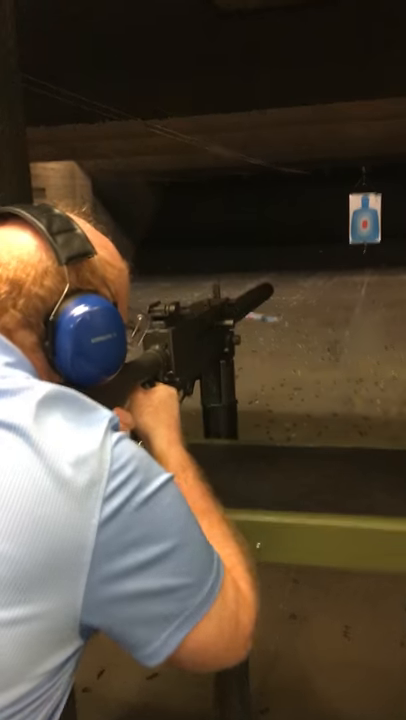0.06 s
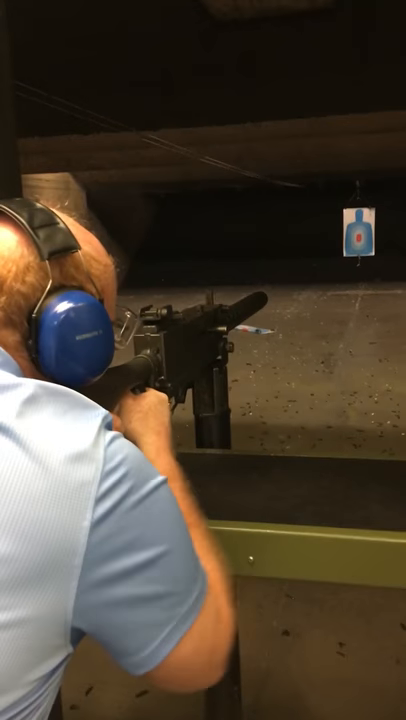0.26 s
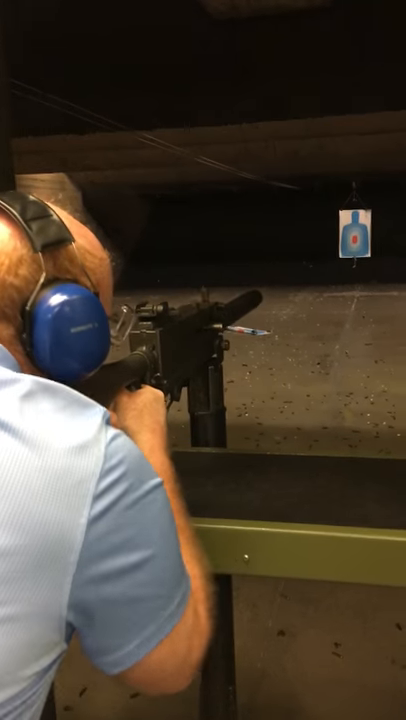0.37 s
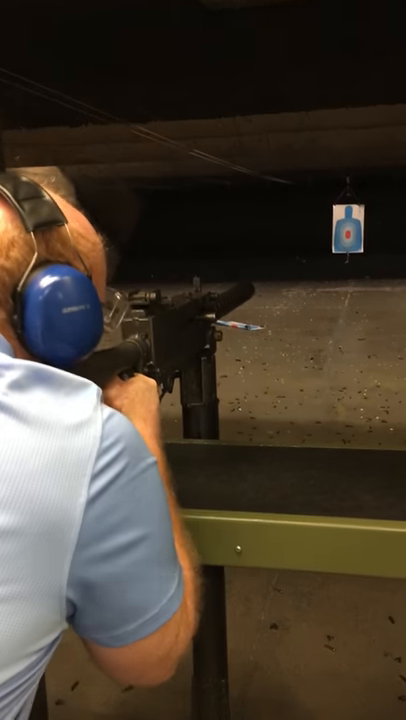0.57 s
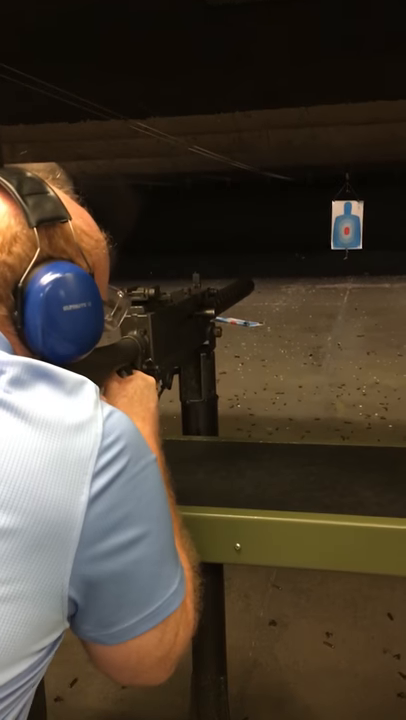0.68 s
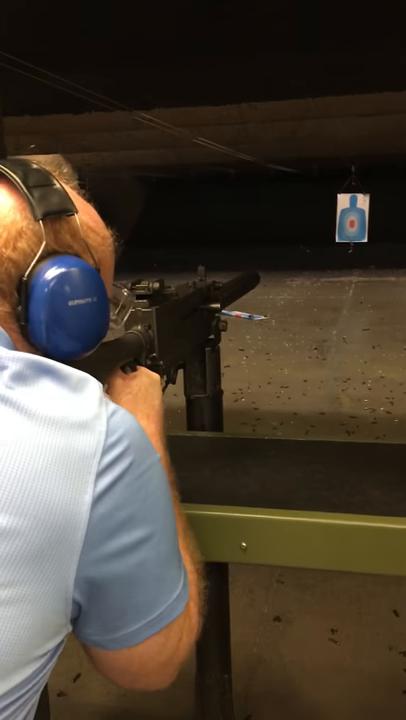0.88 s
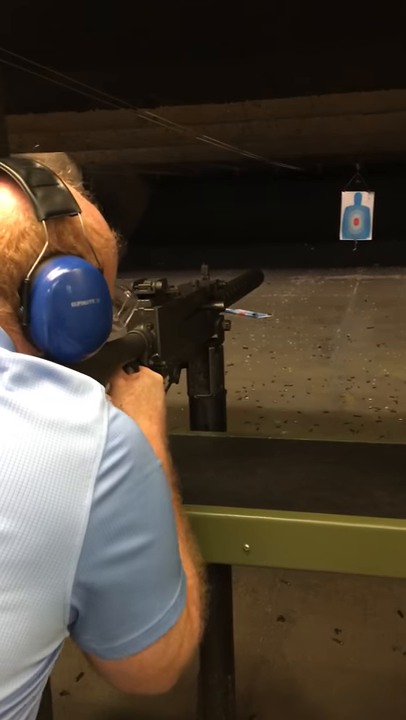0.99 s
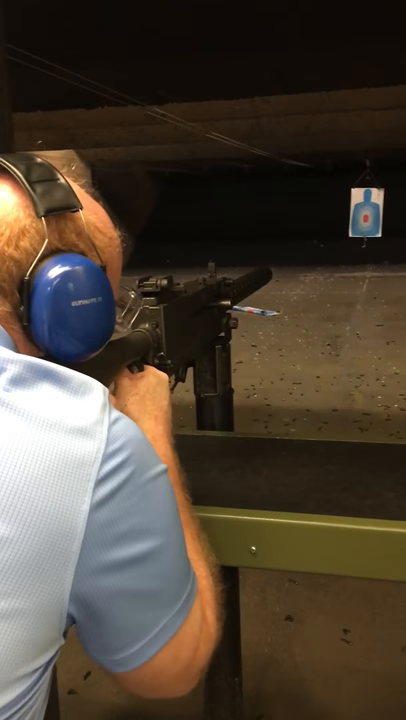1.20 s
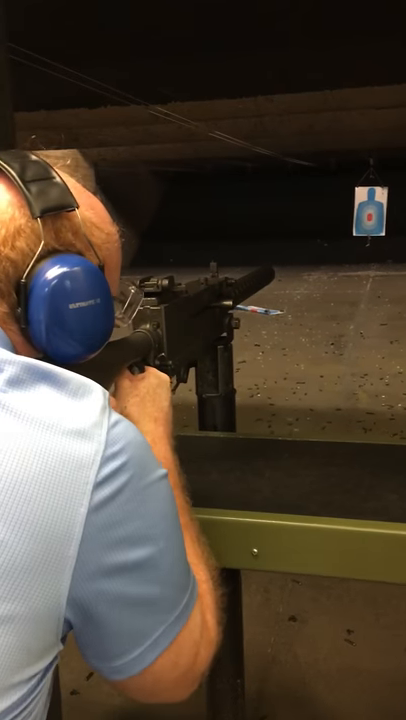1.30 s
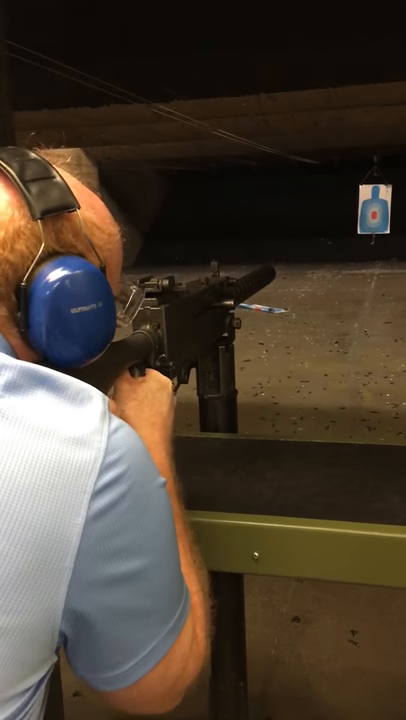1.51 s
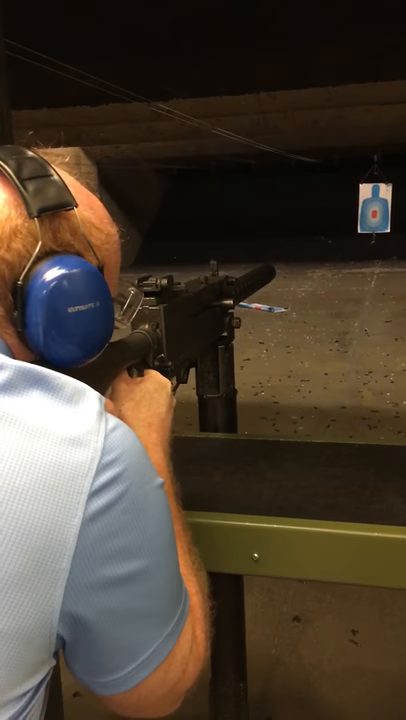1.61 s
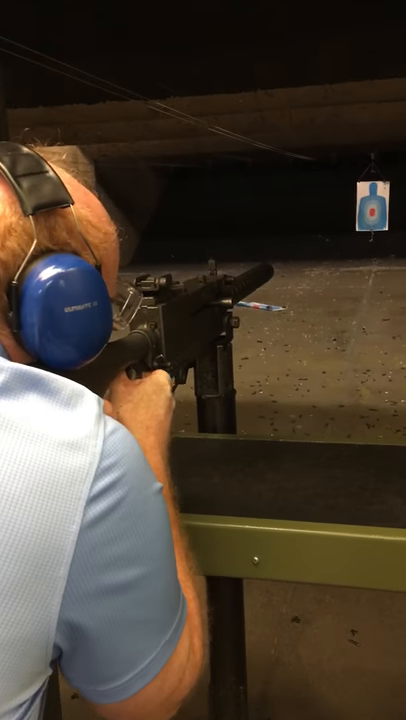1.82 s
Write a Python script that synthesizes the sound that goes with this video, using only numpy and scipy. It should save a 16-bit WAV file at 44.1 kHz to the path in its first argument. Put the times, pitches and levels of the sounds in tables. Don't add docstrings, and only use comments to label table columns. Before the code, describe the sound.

A single loud gunshot blasts in an indoor range, its roar fading under jingling brass cases

```python
import sys
import numpy as np
from scipy import signal
from scipy.fft import rfft, irfft
from scipy.io import wavfile
from scipy.ndimage import uniform_filter1d, minimum_filter1d

SR = 44100
rng = np.random.default_rng(int(sys.argv[2]) if len(sys.argv) > 2 else 0)


def natural_amplitude(level_db):
    exponent = np.asarray(level_db, float) / 20
    return 10 ** exponent


def log_audio(samples):
    frames = np.atleast_2d(samples).T
    limited = np.clip(frames, -1, 1)
    pcm = np.round(limited * 32767).astype(np.int16)
    wavfile.write(sys.argv[1], SR, pcm)


N = 81585
T = np.arange(N) / SR
SHOT_S = 0.2389

CASE_A_HZ, CASE_B_HZ, CASE_C_HZ, CASE_D_HZ = 7450, 8190, 9850, 10900
CASE_E_HZ, CASE_F_HZ, CASE_G_HZ = 12250, 15550, 12500

# frequency in Hz, level in dB per Hz.
SCRAPE_COLOUR = [(1500, -10), (2500, -8.5), (4500, -6.5), (7000, -3), (10000, -5.5), (12700, -5),
                 (13500, -8.5), (15800, -6.5)]


def evened(x):
    return x / np.sqrt(np.mean(x ** 2) + 1e-20)


def noise():
    return rng.standard_normal(N)


def curve(points):
    return natural_amplitude(np.interp(T, *np.transpose(points)))


def read(points, hz):
    f, value = np.transpose(points)
    return np.interp(np.log(hz + 1), np.log(f + 1), value)


def filtered(x, points):
    hz = np.fft.rfftfreq(len(x), 1 / SR)
    return irfft(rfft(x) * natural_amplitude(read(points, hz)), len(x))


def colour(x, points):
    return evened(filtered(x, points))


def slow(seconds):
    size = max(int(seconds * SR), 1)
    return evened(uniform_filter1d(uniform_filter1d(noise(), size), size))


def resonate(x, hz, width_hz):
    r = np.exp(-np.pi * width_hz / SR)
    return signal.lfilter([1, 0, -1], [1, -2 * r * np.cos(2 * np.pi * hz / SR), r * r], x)


def clicks(per_s, spread_db):
    size = natural_amplitude(spread_db * np.minimum(rng.exponential(1, N), 4))
    return size * (rng.random(N) < per_s / SR) * rng.choice([-1., 1.], N)


def burst(start_s, decay_s):
    return np.exp(-np.maximum(T - start_s, 0) / decay_s) * (T > start_s)


def dying(points, t60s, start_s):
    hz, at_s, z = signal.stft(colour(noise(), points), SR, nperseg=512)
    fade_db = -60 * np.maximum(at_s - start_s, 0) / read(t60s, hz)[:, None]
    return signal.istft(z * natural_amplitude(fade_db), SR, nperseg=512)[1][:N]


def air():
    # frequency in Hz, level in dB per Hz.
    air_colour = [(25, 1.5), (70, -14.5), (150, -2.5), (400, -16.5), (1100, -14), (2400, -15), (4100, -35),
                  (9000, -48.5)]
    # frequency in Hz, width in Hz, level in dB.
    duct_tones = [(506, 20, -46), (1045, 40, -45), (300, 25, -51), (1390, 80, -49)]
    level_db, patch_db, waver_db = -37, 0.6, 1.5
    out = natural_amplitude(level_db + patch_db * slow(0.028)) * colour(noise(), air_colour)
    for hz, width_hz, db in duct_tones:
        out = out + natural_amplitude(db + waver_db * slow(0.13)) * evened(resonate(noise(), hz, width_hz))
    return out


def grip():
    # time in seconds, level in dB.
    grip_level = [(0, -37), (.2, -36.5), (.5, -33), (.9, -40.5), (1.1, -39.5), (1.15, -35), (1.21, -45.5),
                  (1.28, -29.5), (1.38, -42), (1.43, -23.5), (1.48, -33), (1.55, -30), (1.585, -41),
                  (1.61, -26.5), (1.65, -41), (1.71, -30), (1.76, -33), (1.79, -40), (1.83, -30.5),
                  (1.85, -31)]
    centre_hz, width_hz, lump_db = 66, 22, 1.2
    low = noise()
    for widen in (1, 2, 2):
        low = resonate(low, centre_hz, widen * width_hz)
    low = evened(low)
    power = abs(uniform_filter1d(low ** 2, size=SR // 40))
    steady = low / np.sqrt(power + 0.05)
    return curve(grip_level) * evened(steady * natural_amplitude(lump_db * slow(0.023)))


def brass():
    # time in seconds, level in dB.
    stir_level = [(0, -32.5), (.18, -28), (.23, -30), (.5, -40), (.72, -51), (.95, -86), (1.1, -56.5),
                  (1.16, -48), (1.32, -46), (1.42, -52), (1.435, -38), (1.51, -37.5), (1.545, -41),
                  (1.6, -40), (1.64, -36.5), (1.72, -29), (1.8, -30), (1.85, -37)]
    # time in seconds, level in dB.
    ring_level = [(0, 0), (.4, -3), (.5, -0.5), (.9, 2), (1.05, -17), (1.4, -14.5), (1.45, -4), (1.62, -3),
                  (1.7, 3.5), (1.85, 3.5)]
    # frequency in Hz, width in Hz, level in dB.
    case_modes = [(4300, 900, -8), (CASE_A_HZ, 120, -12), (CASE_B_HZ, 45, -10), (CASE_C_HZ, 120, -9),
                  (10780, 60, -8), (11000, 90, -6), (11600, 60, -15), (CASE_E_HZ, 80, -6), (12600, 170, -5),
                  (14750, 80, -14), (CASE_F_HZ, 150, -4)]
    # start in seconds, level in dB, decay in seconds.
    case_knocks = [
        (.503, -33, .006),
        (.703, -42, .004),
        (1.2746, -41, .004),
        (1.312, -37, .012),
        (1.4293, -31, .005),
        (1.45, -31, .01),
        (1.652, -30, .005),
        (1.717, -25, .01),
    ]
    clinks_per_s, clink_spread_db, ring_db, patchy_db = 900, 2.5, -2, 2.5
    grit_per_s, grit_spread_db, scrape_db = 6000, 1, -1.5
    ring = 0
    for hz, width_hz, db in case_modes:
        mode = resonate(clicks(clinks_per_s, clink_spread_db), hz, width_hz)
        mode = evened(resonate(mode, hz, 4 * width_hz))
        ring = ring + natural_amplitude(db + patchy_db * slow(0.052)) * mode
    ring = natural_amplitude(ring_db) * curve(ring_level) * evened(ring)
    scrape = colour(clicks(grit_per_s, grit_spread_db), SCRAPE_COLOUR) * natural_amplitude(0.81 * slow(0.087))
    knocks = sum(natural_amplitude(db) * burst(start_s, decay_s) for start_s, db, decay_s in case_knocks)
    stirred = curve(stir_level) * (ring + natural_amplitude(scrape_db) * scrape)
    return stirred + knocks * colour(noise(), SCRAPE_COLOUR)


def pings():
    # start in seconds, frequency in Hz, level in dB, length in seconds, spread in Hz.
    rattles = [(0.053, 11310, -36.5, 0.13, 152), (0.065, CASE_F_HZ, -39, .04, 150),
               (0.1, CASE_C_HZ, -33, 0.035, 120), (.1, CASE_B_HZ, -42, 0.071, 41),
               (0.142, 10800, -35, 0.069, 60), (0.153, CASE_E_HZ, -33, .04, 100),
               (0.175, CASE_B_HZ, -25.5, .028, 40), (0.469, 10930, -35.5, 0.21, 300),
               (0.463, 12400, -37, 0.19, 350), (.49, CASE_F_HZ, -37, 0.14, 300),
               (.59, CASE_A_HZ, -41, 0.054, 60), (0.691, 10950, -41.5, 0.024, 102),
               (0.798, CASE_A_HZ, -62, 0.062, 59.5), (1.162, CASE_D_HZ, -53.5, .11, 80),
               (1.2825, 10850, -37.5, 0.078, 89.5), (1.312, 10700, -41, 0.065, 180),
               (1.313, 9000, -38, 0.011, 600), (1.312, 4700, -45.5, .04, 695),
               (1.382, CASE_D_HZ, -47, 0.043, 300), (1.4313, CASE_G_HZ, -35.5, 0.036, 152),
               (1.4267, 3960, -39, 0.097, 420), (1.435, CASE_F_HZ, -37, 0.091, 310),
               (1.445, CASE_D_HZ, -42, 0.048, 153), (1.452, 6350, -37.5, 0.04, 700),
               (1.493, 10800, -39, 0.034, 200), (1.546, CASE_D_HZ, -44, 0.082, 200),
               (1.576, CASE_G_HZ, -35, .03, 100), (1.608, CASE_D_HZ, -30, 0.069, 150),
               (1.646, CASE_D_HZ, -28, 0.034, 200), (1.65, CASE_E_HZ, -32, 0.039, 100),
               (1.664, 3970, -30.5, 0.031, 900), (1.686, CASE_C_HZ, -28, 0.1, 70),
               (1.713, 3800, -31, 0.011, 1200), (1.716, CASE_E_HZ, -44, 0.05, 200),
               (1.722, CASE_F_HZ, -49, 0.052, 200), (1.735, CASE_D_HZ, -38, .025, 150),
               (1.745, CASE_C_HZ, -25.5, 0.046, 70), (1.741, 4500, -40.5, 0.06, 1500),
               (1.779, CASE_D_HZ, -26, 0.055, 150), (1.78, CASE_B_HZ, -36, 0.042, 70)]
    sag_db, stop_t60_s, rise_s = -8.5, 0.063, 0.0027
    out = np.zeros(N + SR)
    t = np.arange(SR // 2) / SR
    for start_s, hz, db, length_s, spread_hz in rattles:
        tone = resonate(resonate(rng.standard_normal(SR), hz, spread_hz), hz, 2 * spread_hz)
        tone = evened(tone[len(t):])
        fade_db = sag_db * np.minimum(t / length_s, 1)
        fade_db = fade_db - 60 * np.maximum(t - length_s, 0) / stop_t60_s
        out[round(start_s * SR):][:len(t)] += natural_amplitude(db + fade_db) * tone * np.minimum(t / rise_s, 1)
    return out[:N]


def brass_dip(x):
    # frequency in Hz, gain in dB.
    narrow_dip = [(12900, 0), (13250, -8), (13500, -14), (13800, -8), (14200, -5), (14600, 0)]
    return filtered(x, narrow_dip)


def room_mode():
    mode_hz, waver_hz, level_db, t60_s, end_s = 168, 8, -13, 2.0, 0.92
    t = np.maximum(T - SHOT_S, 0)
    hum = np.sin(2 * np.pi * np.cumsum(mode_hz + waver_hz * slow(0.057)) / SR)
    fade_db = -60 * t / t60_s - 164 * np.maximum(T - end_s, 0)
    return natural_amplitude(level_db + fade_db) * np.minimum(t * 10, 1) * hum


def thud():
    boom_hz, level_db, peak_s, t60_s = 55.8, -10.5, 0.065, 1
    t = np.maximum(T - SHOT_S, 0)
    fade_db = -60 * np.maximum(t - peak_s, 0) / t60_s
    return natural_amplitude(level_db + fade_db) * np.minimum(t / peak_s, 1) * np.sin(2 * np.pi * boom_hz * t)


def booth():
    # frequency in Hz, width in Hz, level in dB, t60 in seconds.
    booth_modes = [(209, 46, -10, 0.32), (1250, 600, -2.5, 0.17), (2816, 300, -11, 0.3)]
    t = T - SHOT_S
    rise = np.clip(t / 0.002, 0, 1)
    out = 0
    for hz, width_hz, db, t60_s in booth_modes:
        fade_db = -60 * np.maximum(t, 0) / t60_s
        out = out + natural_amplitude(db + fade_db) * rise * evened(resonate(noise(), hz, width_hz))
    return out


def slaps():
    # start in seconds, level in dB, decay in seconds.
    wall_slaps = [
        (.256, -27.5, .004),
        (.277, -14, .005),
        (.302, -35.5, .004),
        (.327, -13.5, .004),
    ]
    bursts = sum(natural_amplitude(db) * burst(start_s, decay_s) for start_s, db, decay_s in wall_slaps)
    return bursts * colour(noise(), SCRAPE_COLOUR)


def bolt():
    start_s, level_db, top_hz = 0.218, -25, 2400
    rub = evened(signal.lfilter(*signal.butter(2, top_hz, fs=SR), noise()))
    return natural_amplitude(level_db) * rub * np.clip((T - start_s) / 0.0029, 0, 1) * (T < SHOT_S)


def push():
    push_hz, level_db, peak_s, rise_s = 150, -5, 0.0008, 0.0045
    before = np.minimum(T - SHOT_S, 0)
    swing = np.cos(2 * np.pi * push_hz * (before + peak_s))
    return natural_amplitude(level_db) * swing * np.exp(before / rise_s) * (T < SHOT_S)


def blast():
    level_db, length_ms, soft_hz = 0, 0.5, 5000
    t = T - SHOT_S
    u = np.maximum(t, 0) * 1000 / length_ms
    pulse = -natural_amplitude(level_db) * (1 - u) * np.exp(-u) * (t >= 0)
    return signal.lfilter(*signal.butter(1, soft_hz, fs=SR), pulse)


def hall():
    # frequency in Hz, level in dB per Hz.
    roar_colour = [(40, -36), (65, -7.5), (179, -2), (473, -1.5), (937, -7), (1960, -18.5), (5740, -18.5),
                   (14400, -32.5), (16000, -43.5)]
    # frequency in Hz, t60 in seconds.
    roar_t60 = [(50, 1), (300, 0.69), (1500, 0.063), (5000, 0.41), (9000, 0.5), (15000, 0.038)]
    # frequency in Hz, level in dB per Hz.
    hall_colour = [(40, -20.5), (100, -3), (160, -2.5), (320, -5), (950, -6), (2000, -13.5), (4500, -23.5),
                   (10000, -40)]
    # frequency in Hz, t60 in seconds.
    hall_t60 = [(60, 0.98), (250, 0.88), (700, 1), (1800, 0.98), (4000, 0.84), (8000, 0.37), (15000, 0.34)]
    # delay after the shot in seconds, level in dB.
    far_returns = [
        (0.141, -23),
        (0.23, -10.5),
        (0.332, -15),
    ]
    roar_db, roar_hold_s, roar_rise_s = -2.5, 0.12, 0.002
    grain_db, grain_s = 1.2, 0.0015
    tail_db, tail_hold_s, tail_rise_s = -7, 0.29, 0.028
    t = T - SHOT_S
    roar = dying(roar_colour, roar_t60, SHOT_S + roar_hold_s) * np.clip(t / roar_rise_s, 0, 1)
    roar = natural_amplitude(roar_db + grain_db * slow(grain_s)) * roar
    tail = dying(hall_colour, hall_t60, SHOT_S + tail_hold_s) * np.clip(t / tail_rise_s, 0, 1)
    swell = 1 + sum(natural_amplitude(db) * burst(SHOT_S + delay_s, 0.063) for delay_s, db in far_returns)
    return (roar + natural_amplitude(tail_db) * tail) * swell


def shot():
    return bolt() + push() + blast() + hall()


def scene():
    background = air() + grip() + brass_dip(brass() + pings())
    ringing = room_mode() + thud() + booth() + slaps()
    return (background + ringing + shot())[None]


def top_cut(x):
    return signal.sosfilt(signal.butter(12, 16850, fs=SR, output="sos"), x)


def record(dry):
    # time in seconds, gain in dB.
    recorder_gain = [(0, 0), (.236, -2.5), (.245, -3.5), (.33, -7.5), (.362, -12), (.378, -14), (.44, -22),
                     (.49, -21.5), (.7, -17.5), (1.0, -13), (1.4, -5.5), (1.85, -4.5)]
    edge_hz, limit, limit_s = 15750, 0.99, 0.0015
    x = dry * curve(recorder_gain)
    lowpass = signal.firwin(511, edge_hz, window=("kaiser", 9), fs=SR)
    x = signal.oaconvolve(x, lowpass[None], "same")
    size = int(limit_s * SR)
    headroom = minimum_filter1d(limit / np.maximum(abs(x), limit), size=size)
    x = x * uniform_filter1d(headroom, size=size)
    return top_cut(np.clip(x, -1, 1))


dry = scene()
out = record(dry)
log_audio(out)
```